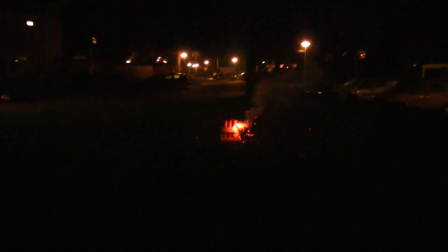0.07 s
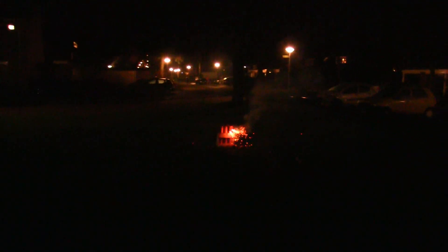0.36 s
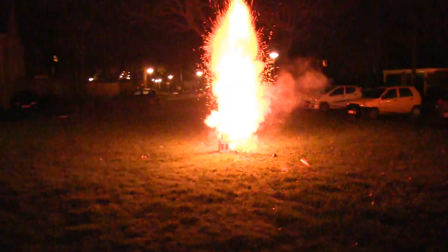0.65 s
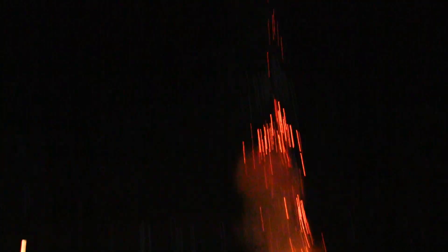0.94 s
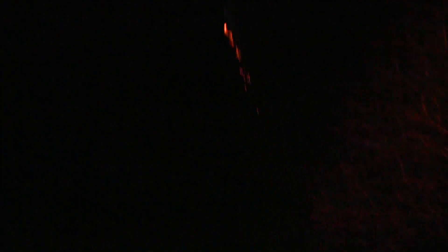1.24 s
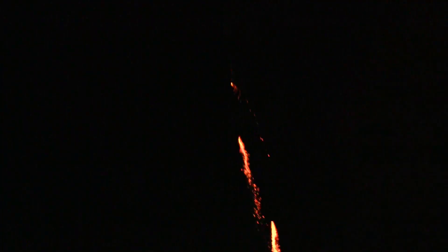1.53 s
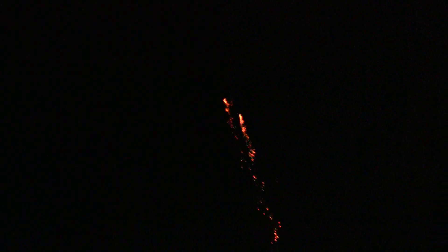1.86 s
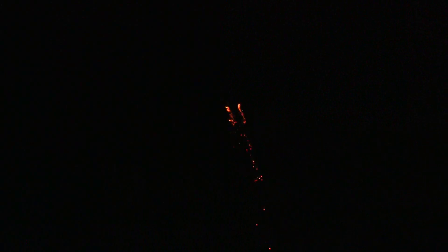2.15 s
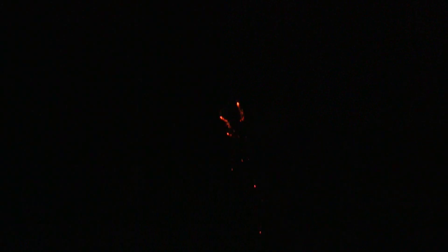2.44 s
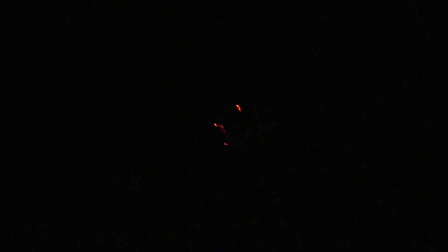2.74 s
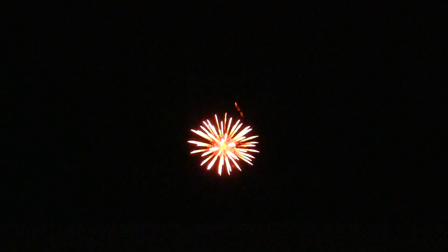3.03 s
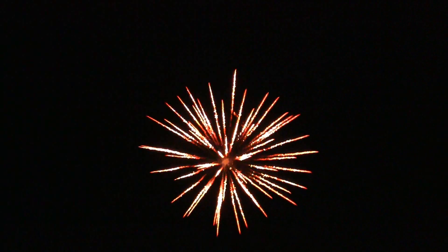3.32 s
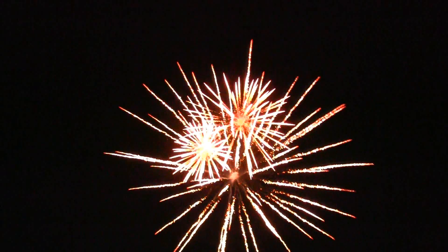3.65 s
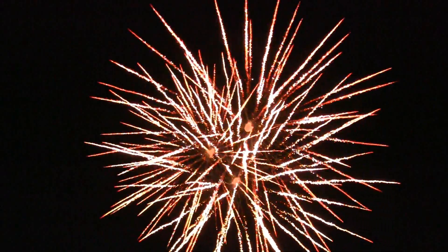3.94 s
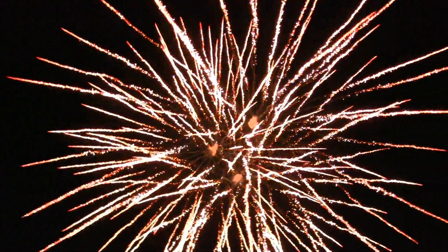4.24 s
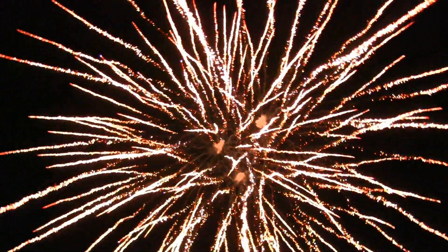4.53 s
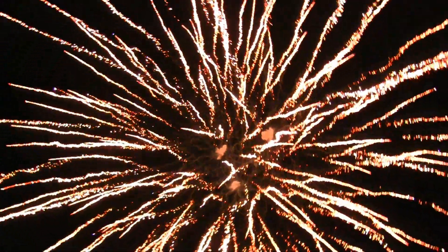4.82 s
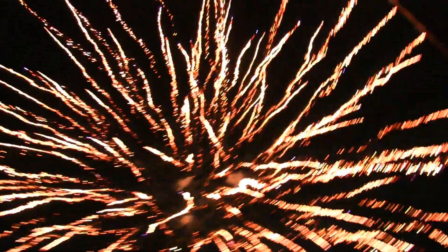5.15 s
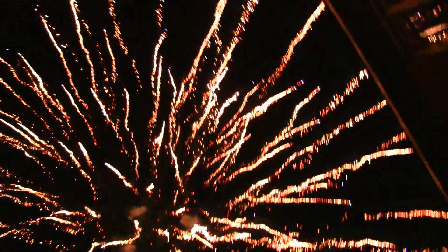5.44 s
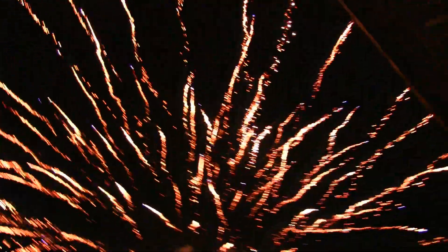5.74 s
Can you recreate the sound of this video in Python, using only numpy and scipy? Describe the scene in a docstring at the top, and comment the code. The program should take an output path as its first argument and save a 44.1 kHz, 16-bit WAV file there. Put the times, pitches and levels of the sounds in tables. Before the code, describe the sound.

A very faint fuse fizz sits over the low rumble of a quiet night street, and two dull, distant fireworks pop at about 0.3 and 0.5 seconds. At 0.65 seconds a firework cake fires its first volley: short spits of gas, two deep thumps and a sharp crack, with a sputtering hiss that fades as the shells climb. A second volley follows at 1.3 to 1.4 seconds with a harder crack. Both slap back from house fronts and leave a low, rolling echo. A far pop sounds at 2.5 seconds. At 3.3 seconds a shell bursts overhead with a sharp bang, then two more explode almost together near 3.9 and 4.0 seconds with heavier booms. Their echoes scatter off the houses and roll through the neighbourhood, with another distant pop at 4.7 seconds, dying away towards 6 seconds.

```python
"""Two distant firework pops over a faint fuse fizz, then a cake fires two mortar volleys in a night street.
Each lift spits gas, thumps and cracks; the shells' burning tails hiss upward.
Three shells burst overhead, each a sharp shock front plus a bass boom.
House fronts slap the reports back, echoes roll through the neighbourhood, more fireworks pop far away."""
import sys
import numpy as np
from scipy import signal
from scipy.fft import rfft, irfft
from scipy.io import wavfile
from scipy.ndimage import uniform_filter1d

SR = 44100
rng = np.random.default_rng(int(sys.argv[2]) if len(sys.argv) > 2 else 0)


def persist_wave(psi):
    """Save psi, clipped to +-1, as 16-bit WAV."""
    counts = np.round(np.clip(psi, -1, 1) * 32767).astype(np.int16)
    wavfile.write(sys.argv[1], SR, np.atleast_2d(counts).T)


N = 263718
TIME_S = np.arange(N) / SR
PULSE_TIME_S = TIME_S[:SR // 10]
FREQS_HZ = np.maximum(np.arange(N // 2 + 1) * SR / N, 1)

# night ambience: f/Hz, level/dB
NIGHT_SPECTRUM = [(25, -2), (60, 1), (137, -0.5), (223, -18.5), (344, -20.5), (500, -18), (700, -22),
                  (1100, -25), (1400, -29), (6700, -44.5), (10400, -57.5), (16000, -61)]
# distant fireworks: t/s, shock/dB, boom/dB, roll/dB
DISTANT_POPS = [(.3463, -27, -21.5, -31.5), (.5105, -32.5, -39.5, -56.5), (2.4943, -31.5, -28.5, -41),
                (4.6797, -27.5, -25, -44)]
# their detours via other streets: delay/s, shock/dB, boom/dB, roll/dB
DISTANT_PATHS = [(.07, -17.5, -31, -15.5), (.134, -13.5, -27, -11.5), (.165, -13, -11.5, -7.5),
                 (.312, -17.5, -30, -12), (.39, -25, -32, -15.5)]
# loudest bangs returning from far blocks: t/s, boom/dB, roll/dB
BLOCK_ECHOES = [(1.748, -18, -49), (4.222, -13.5, -46), (4.771, -44, -34.5), (5.202, -39, -47.5)]
# rolling echo of lifts: f/Hz, level/dB
LIFT_ROLL_SPECTRUM = [(25, -20), (55, -9), (95, -3.5), (132, 2), (195, -13), (290, -36.5), (550, -29),
                      (1190, -36), (1500, -35.5), (2100, -32.5), (2600, -36.5), (4300, -37.5), (8100, -49),
                      (15000, -68)]
# rolling echo of bursts: f/Hz, level/dB
SKY_ROLL_SPECTRUM = [(25, -25), (60, -8), (105, 1), (145, 4.5), (200, -6), (270, -21), (360, -28),
                     (550, -20.5), (800, -25), (1150, -29), (2000, -28.5), (4300, -30.5), (8000, -34),
                     (15000, -44.5)]
# air and ground absorption, lift echoes: f/Hz, loss/(dB/s)
LIFT_ABSORPTION = [(40, 23.5), (140, 36.5), (400, 46), (1200, 31), (3000, 35.5), (6000, 43.5),
                   (12000, 79.5)]
# air and ground absorption, burst echoes: f/Hz, loss/(dB/s)
SKY_ABSORPTION = [(40, 7.7), (140, 12), (400, 17), (1200, 11), (3000, 15), (6000, 38), (9000, 66),
                  (14000, 113)]
# smeared echo off house rows: f/Hz, level/dB
WASH_SPECTRUM = [(200, -40), (500, -18), (800, -1), (1150, 7), (1700, -2), (4000, -20), (9000, -62)]
# house rows: delay/s, level/dB re burst roll
HOUSE_ROW_PATHS = [(.18, -26.5), (.365, -32.5)]
# house fronts around the tubes: delay/s, shock/dB, boom/dB
LIFT_SLAP_PATHS = [(0.0192, -12, -9.5), (0.074, -19.5, -9), (0.123, -18, -6.5), (.147, -26, -10),
                   (.1615, -17, -8.5), (0.233, -40, -19.5)]
# ground and walls around the listener: delay/s, shock/dB, boom/dB
BURST_SLAP_PATHS = [(.0036, -3, -2), (.007, -17, 5), (.012, -0.5, -22.5), (.025, -14.5, -14.5),
                    (.0362, -3.5, -3), (.109, -21, -7), (0.191, -32, -19)]
# hiss of burning shell tails: f/Hz, level/dB
CLIMB_SPECTRUM = [(300, -8.5), (1000, 0), (1600, -3), (2100, -1), (2800, 0), (4400, 0.5), (6000, -3.5),
                  (7700, -2), (11000, -10.5), (15500, -18.5)]
# climbing volleys: t/s, level/dB, hold/s
CLIMBS = [(0.644, -33, .235), (1.27, -26, .15)]
# muzzle gas: t/s, bright jet/dB, dull jet/dB, length/s, centre/Hz, puff/dB
GAS_SPITS = [(0.6487, -11, -15.5, 0.0015, 3953, -16.5), (0.676, -13.5, -19.5, 0.0014, 2806, -14.5),
             (0.7195, -13.5, -14.5, 0.0044, 4400, -11), (0.839, -15, -19, .0018, 1900, -17.5),
             (1.2722, -14.5, -9.5, .0021, 2850, -15.5), (1.318, -12.5, -19.5, .0017, 2766, -26.5),
             (1.3626, -17, -21, 0.00183, 2160, -12)]
# lift charges: t/s, crack/dB, thump/dB, slap/dB, roll/dB
LIFT_CHARGES = [(0.647, -12, -2, -13.5, -25), (0.7425, 0.5, 0, -1.5, -6), (1.3158, -15.5, 1.5, 0, -10),
                (1.4183, 4, 0.5, -3.5, -13.5)]
# overhead bursts: t/s, shock/dB, boom/dB, slap/dB, roll/dB
SHELL_BURSTS = [(3.3097, -1, -15, -6.5, -19), (3.892, -0.5, -1.5, -10, -17.5),
                (3.9759, -6.5, -6, -5.5, -17.5)]
# microphone colour: f/Hz, width/Hz, gain/dB
MIC_BANDS = [(258, 100, 1.5), (354, 120, 0), (530, 160, 2.5), (1140, 890, 3), (1532, 360, -1.5)]


def from_db(db):
    """Decibels to gain."""
    return 10 ** (np.asarray(db) / 20)


def rms_one(x):
    """Scale to rms 1."""
    return x / np.sqrt(np.mean(x ** 2) + 1e-20)


def at_hz(points, hz):
    """Table lookup on a log-frequency axis."""
    known_hz, values = np.transpose(points)
    return np.interp(np.log(hz), np.log(known_hz), values)


def cut(x, hz, kind, order=2):
    """Causal low-pass or high-pass."""
    return signal.sosfilt(signal.butter(order, hz, kind, fs=SR, output="sos"), x)


def noise(spectrum):
    """Coloured noise, rms 1."""
    return rms_one(irfft(rfft(rng.standard_normal(N)) * from_db(at_hz(spectrum, FREQS_HZ)), N))


def flicker(rate_hz, depth_db):
    """Random gain, mean power 1."""
    return rms_one(from_db(depth_db * rms_one(cut(rng.standard_normal(N), rate_hz, "low"))))


def swell(t, peak_s):
    """Rise to 1 at peak_s, then decay."""
    return t / peak_s * np.exp(1 - t / peak_s)


def held(start_s, hold_s, fade_db_per_s):
    """Unity gain until the hold ends, then a steady fade."""
    return from_db(-fade_db_per_s * np.maximum(TIME_S - start_s - hold_s, 0))


def add(out, start_s, sound):
    """Mix a sound in at start_s."""
    start = round(start_s * SR)
    out[start:start + len(sound)] += sound[:N - start]


def echoed(events, paths):
    """Every event along every path: delays and decibels add."""
    return [tuple(np.add(event[:len(path)], path)) for event in events for path in paths]


def boom(boom_hz=128.4, heave_hz=54, heave_db=-21, peak_s=0.0063):
    """Blast bass: about three cycles over one deeper heave of air."""
    t = PULSE_TIME_S
    heave = from_db(heave_db) * np.sin(2 * np.pi * heave_hz * t) * swell(t, peak_s)
    return heave - np.sin(2 * np.pi * boom_hz * t + 0.46) * swell(t, peak_s) ** 2.9


def shock(push_s, top_hz, grit_db, snap_db):
    """Pressure jump with a snap, suction after push_s, and a grit of ground scatter."""
    t = PULSE_TIME_S
    wave = (1 - t / push_s) * np.exp(-t / push_s)
    snap = from_db(snap_db) * np.sin(2 * np.pi * 1300 * t) * np.exp(-t / 0.00022)
    grit = from_db(grit_db) * cut(rng.standard_normal(len(t)), 1800, "low", order=1) * np.exp(-t / 0.016)
    return cut(wave + snap + grit, top_hz, "low")


def reports(rows, **shock_shape):
    """One shock front plus boom per row."""
    out = np.zeros(N)
    for t_s, shock_db, boom_db, *_ in rows:
        add(out, t_s, from_db(shock_db) * shock(**shock_shape) + from_db(boom_db) * boom())
    return out


def roll(rows, spectrum, absorption, build_s, spread_s, grain_db):
    """Dense echoes build up, thin with distance and are absorbed octave by octave."""
    paths = noise(spectrum) * flicker(180, grain_db)
    # bounces off nearby walls comb the spectrum
    lags = (rng.uniform(0.0034, 0.04, size=4) * SR).astype(int)
    bounces = sum(np.roll(paths, lag) for lag in lags)
    echoes = rfft(rms_one(paths + 0.11 * bounces))
    grid_s = TIME_S[::64]
    starts_s, levels_db = np.array([(row[0], row[-1]) for row in rows]).T[..., None]
    age_s = np.maximum(grid_s - starts_s, 0)
    spreading = from_db(levels_db) * (1 - np.exp(-age_s / build_s)) / (1 + age_s / spread_s)
    out = np.zeros(N)
    for hz in 17.5 * 2. ** np.arange(11):
        octave = np.maximum(1 - np.abs(np.log2(FREQS_HZ / hz)), 0)
        band = irfft(echoes * octave, N)
        # hold each octave's level steady so the rolling echo fades smoothly
        band *= band.std() / np.sqrt(uniform_filter1d(band ** 2, size=3000) + 1e-20)
        power = np.sum((spreading * from_db(-at_hz(absorption, hz) * age_s)) ** 2, axis=0)
        out += band * np.interp(TIME_S, grid_s, np.sqrt(power))
    return out


def night(level_db=-60.5):
    """Faint, steady low rumble."""
    return from_db(level_db) * noise(NIGHT_SPECTRUM)


def distance():
    """Dull far pops repeat via other streets; they and the far-block echoes roll on."""
    pops = DISTANT_POPS + echoed(DISTANT_POPS, DISTANT_PATHS)
    bangs = reports(pops, push_s=0.00076, top_hz=2200, grit_db=-5, snap_db=-21)
    tail = roll(pops + BLOCK_ECHOES, SKY_ROLL_SPECTRUM, SKY_ABSORPTION,
                build_s=0.02, spread_s=0.025, grain_db=2)
    return cut(bangs, 6500, "low") + cut(tail, 2400, "low")


def street_roll():
    """Lifts and bursts reverberate through the neighbourhood."""
    lifts = roll(LIFT_CHARGES, LIFT_ROLL_SPECTRUM, LIFT_ABSORPTION,
                 build_s=0.072, spread_s=0.32, grain_db=0.6)
    bursts = roll(SHELL_BURSTS, SKY_ROLL_SPECTRUM, SKY_ABSORPTION,
                  build_s=0.016, spread_s=0.12, grain_db=1)
    return lifts + bursts


def washes():
    """House rows smear each burst into midrange echoes that swell, flutter and fade."""
    bursts = [(t_s, roll_db) for t_s, *_, roll_db in SHELL_BURSTS]
    gain = np.zeros(N)
    for t_s, wash_db in echoed(bursts, HOUSE_ROW_PATHS):
        add(gain, t_s, from_db(wash_db) * swell(TIME_S[:SR], peak_s=0.018))
    return gain * noise(WASH_SPECTRUM) * flicker(47, depth_db=0.5)


def strays(rate_per_s=70, re_roll_db=-6.5, spread_db=3.5):
    """Single roofs and cars return small copies of each burst at random times."""
    arrivals = rng.random(N) < rate_per_s / SR
    clicks = arrivals * from_db(spread_db * np.clip(rng.standard_normal(N), -2, 2))
    fade = sum(from_db(roll_db + re_roll_db) * (TIME_S > t_s) * held(t_s, 0, fade_db_per_s=41.5)
               for t_s, *_, roll_db in SHELL_BURSTS)
    echo = shock(push_s=0.00036, top_hz=2200, grit_db=-13, snap_db=-4)
    return signal.fftconvolve(clicks * fade, echo)[:N]


def slaps():
    """Ground and house fronts reflect lifts and bursts; far blocks return booms without the shock."""
    lifts = [(t_s, slap_db, slap_db) for t_s, _, _, slap_db, _ in LIFT_CHARGES]
    bursts = [(t_s, slap_db, slap_db) for t_s, _, _, slap_db, _ in SHELL_BURSTS]
    reflections = echoed(lifts, LIFT_SLAP_PATHS) + echoed(bursts, BURST_SLAP_PATHS)
    out = reports(reflections, push_s=0.0013, top_hz=8000, grit_db=-22.5, snap_db=-5.5)
    for t_s, boom_db, _ in BLOCK_ECHOES:
        add(out, t_s, from_db(boom_db) * boom())
    return out


def fuse(level_db=-67.5, ground_delay_s=0.00049):
    """Fizz until the first lift, combed by its ground reflection."""
    fizz = noise([(600, -20.5), (2000, -5.5), (4200, -5), (8000, -9.5), (12000, -12), (15000, -14.5)])
    combed = rms_one(fizz + 0.4 * np.interp(TIME_S - ground_delay_s, TIME_S, fizz))
    return from_db(level_db) * held(0, LIFT_CHARGES[0][0], fade_db_per_s=229) * combed


def climbing_shells(attack_s=0.005, fade_db_per_s=107):
    """Burning tails sputter and hiss; air absorbs the treble as they recede."""
    hiss = noise(CLIMB_SPECTRUM) * flicker(120, depth_db=2.5)
    nearness = np.zeros(N)
    for t_s, level_db, hold_s in CLIMBS:
        onset = np.clip((TIME_S - t_s) / attack_s, 0, 1)
        nearness += from_db(level_db) * onset * held(t_s, hold_s, fade_db_per_s)
    dull = signal.sosfiltfilt(signal.butter(2, 7500, fs=SR, output="sos"), hiss)
    clarity = np.sqrt(nearness / nearness.max())
    return nearness * (dull + clarity * (hiss - dull))


def jet(length_s, centre_hz, q):
    """Spurt of turbulent gas: a noise hump around centre_hz."""
    flow = np.sqrt(swell(PULSE_TIME_S, length_s / 2))
    turbulence = rng.standard_normal(len(flow)) * flow
    hump = signal.lfilter(*signal.iirpeak(centre_hz, q, fs=SR), turbulence)
    hump = cut(hump, 0.22 * centre_hz, "high")
    hump = cut(hump, 1.6 * centre_hz, "low", order=1)
    return rms_one(hump) * np.sqrt(np.mean(flow ** 2))


def muzzle_gas(puff_hz=205):
    """Gas rips from the tube, bright, then dull as pressure drops, pushing a puff of air."""
    puff = -np.sin(2 * np.pi * puff_hz * PULSE_TIME_S) * np.exp(-PULSE_TIME_S / 0.0065)
    out = np.zeros(N)
    for t_s, bright_db, dull_db, length_s, centre_hz, puff_db in GAS_SPITS:
        add(out, t_s, from_db(bright_db) * jet(length_s, centre_hz, q=0.85))
        dull = from_db(dull_db) * jet(length_s, 0.38 * centre_hz, q=1.5)
        add(out, t_s + 0.9 * length_s, dull + from_db(puff_db) * puff)
    return out


def lift_charges(crack_lag_s=0.0036):
    """Each charge thumps; on the crest a shock escapes as the shell clears its tube."""
    out = np.zeros(N)
    for t_s, crack_db, thump_db, *_ in LIFT_CHARGES:
        add(out, t_s, from_db(thump_db) * boom())
        crack = shock(push_s=0.0015, top_hz=7000, grit_db=-22.5, snap_db=-0.5)
        add(out, t_s + crack_lag_s, from_db(crack_db) * crack)
    return out


def shell_bursts():
    """Shells explode overhead: direct shock and boom."""
    return reports(SHELL_BURSTS, push_s=0.0022, top_hz=12500, grit_db=-13, snap_db=-5)


def scene():
    """Night, echoes and fireworks, identical in both channels."""
    direct = muzzle_gas() + lift_charges() + shell_bursts() + fuse() + climbing_shells()
    echoes = street_roll() + washes() + strays() + slaps()
    mono = night() + distance() + echoes + direct
    return np.array([mono, mono])


def record(dry, bottom_hz=29, top_hz=16000):
    """Microphone colour, bass cut, soft clipping, steep treble cut."""
    for hz, width_hz, gain_db in MIC_BANDS:
        band = signal.lfilter(*signal.iirpeak(hz, hz / width_hz, fs=SR), dry)
        dry = dry + (from_db(gain_db) - 1) * band
    clipped = 0.96 * np.tanh(cut(dry, bottom_hz, "high", order=1) / 0.92)
    return signal.sosfilt(signal.ellip(12, 0.1, 110, top_hz, fs=SR, output="sos"), clipped)


dry = scene()
out = record(dry)
persist_wave(out)
```